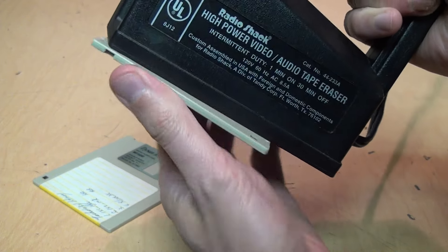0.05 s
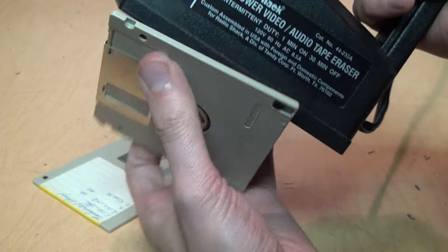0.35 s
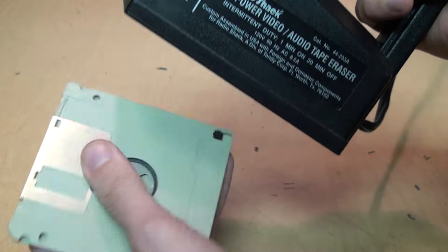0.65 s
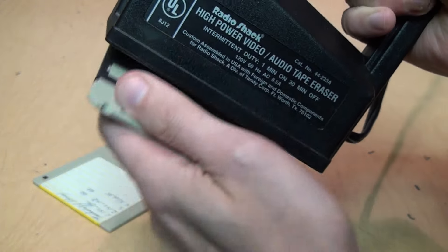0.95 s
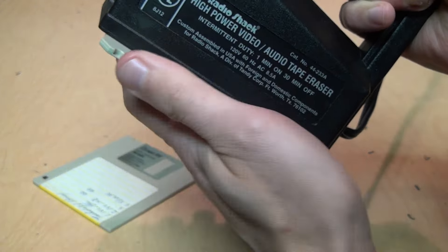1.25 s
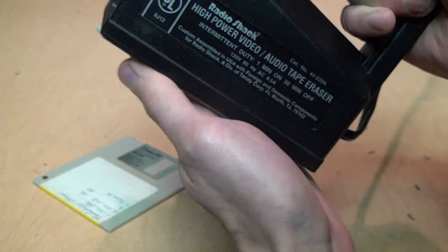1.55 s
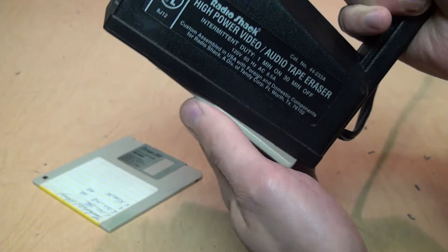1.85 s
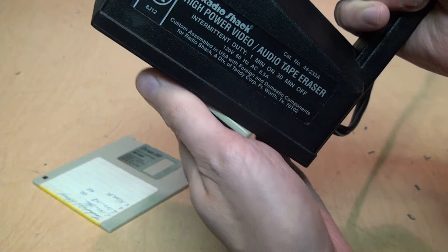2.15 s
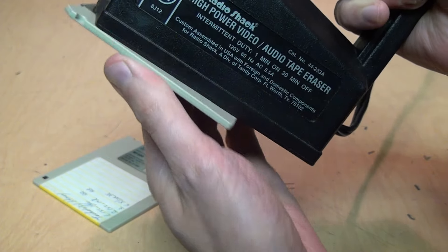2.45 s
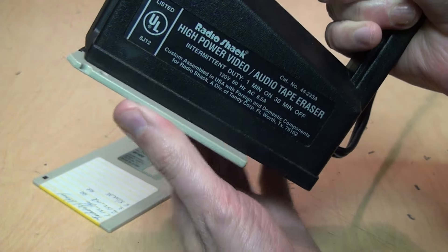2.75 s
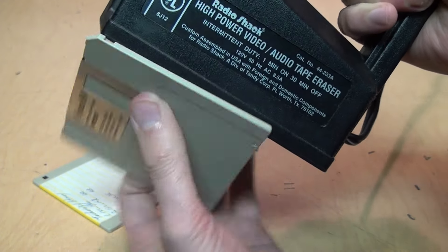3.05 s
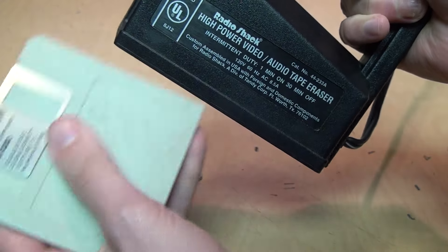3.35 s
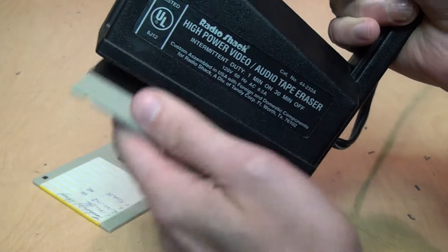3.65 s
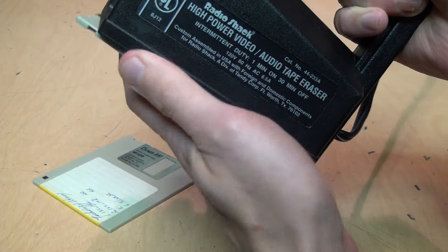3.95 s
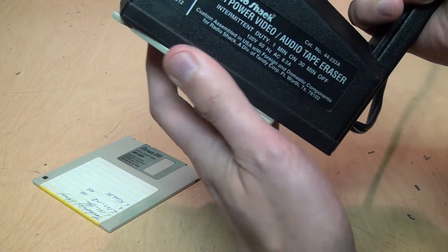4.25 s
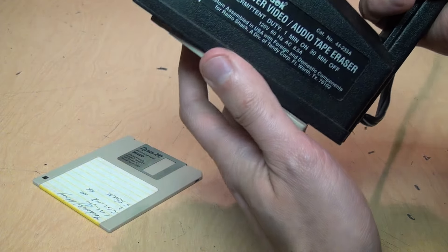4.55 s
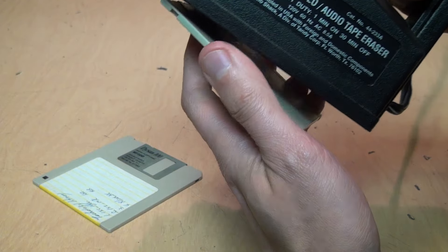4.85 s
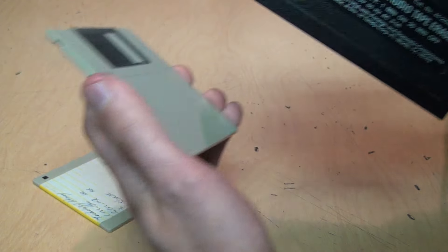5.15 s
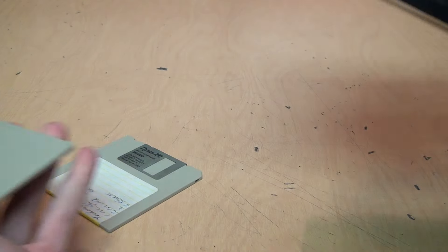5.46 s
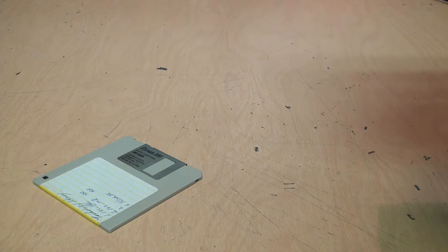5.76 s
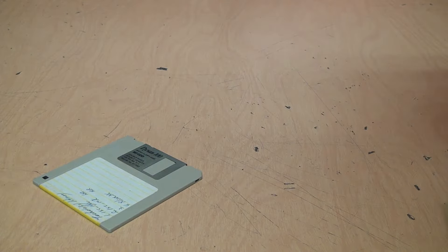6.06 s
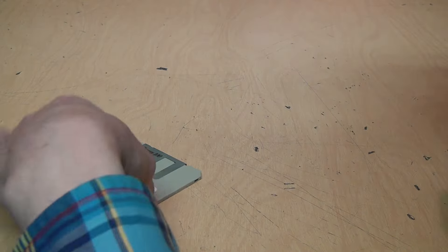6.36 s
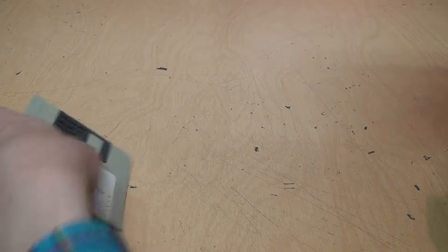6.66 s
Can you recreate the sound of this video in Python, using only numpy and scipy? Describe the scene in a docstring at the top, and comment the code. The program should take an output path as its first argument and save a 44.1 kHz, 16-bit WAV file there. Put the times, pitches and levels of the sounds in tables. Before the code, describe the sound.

An electric tape eraser buzzes and rattles against a plastic floppy disk in three bursts, followed by a few light plastic clacks.

```python
"""In a small quiet room, over a wooden table, floppy disks are held against a mains-powered tape eraser.
In three passes its magnet slaps the disk against the case twice per mains cycle, making a hum and a
hard rattle that snarls where the disk catches and turns ragged as it slides.
The disk scrapes as it is turned over. At the end it is put down with a few clacks
and the next one is picked up."""
import sys
import numpy as np
from scipy import signal
from scipy.fft import rfft, irfft
from scipy.io import wavfile
from scipy.ndimage import uniform_filter1d, map_coordinates

SR = 44100
rng = np.random.default_rng(int(sys.argv[2]) if len(sys.argv) > 2 else 0)


def store_pcm(level_fs):
    """Save levels as 16-bit WAV."""
    pcm = np.round(np.clip(level_fs, -1, 1) * 32767).astype(np.int16)
    wavfile.write(sys.argv[1], SR, np.atleast_2d(pcm).T)


N = 299880
TIME = np.arange(N) / SR
SLAP_HZ = 119.9   # two slaps per mains cycle
ROOM_T60_S = 0.12   # time for an echo to fade by 60 dB

# the disk is brought to the magnet, buzzes and is drawn away: start_s, end_s, level_db, rim_db
ERASING_PASSES = [(-.1, 0.377, -26, -13.5), (0.873, 2.975, -27.5, -10.5), (3.599, 4.849, -26.5, -11.5)]
# the disk catches on the case and snarls: start_s, end_s, level_db, pitch_hz, width_hz, rim_db
DISK_CATCHES = [(.005, 0.068, -20, 2240, 645, -12.5), (0.191, 0.27, -21, 2180, 1280, -8),
                (0.308, 0.42, -27.5, 1840, 447, -11.5), (0.981, 1.03, -21, 2490, 1500, -14),
                (1.104, 1.15, -26.5, 2540, 676, -30), (1.194, 1.285, -23.5, 2330, 2430, -7.5),
                (1.325, 1.395, -26.5, 1880, 990, -2.5), (1.57, 1.68, -27.5, 2060, 500, -10.5),
                (1.725, 2.11, -26.5, 1100, 1290, -5.5), (1.968, 2.154, -26.5, 1840, 900, -9.5),
                (2.145, 2.315, -23.5, 2330, 790, -8.5), (2.434, 2.41, -17, 2020, 1180, 1.5),
                (2.505, 2.74, -24, 2470, 890, -6), (2.828, 2.953, -24, 1840, 444, -5),
                (2.914, 3.005, -25.5, 2240, 2980, 1), (3.695, 3.682, -18.5, 3100, 1580, -4.5),
                (3.72, 3.822, -27, 1180, 1000, -36), (3.96, 4.1, -39.5, 2800, 350, -26),
                (4.25, 4.29, -32, 2800, 1200, -9), (4.382, 4.44, -29.5, 820, 400, -5.5),
                (4.424, 4.47, -19, 2510, 690, -12), (4.546, 4.84, -34.5, 2140, 3100, -0.5),
                (4.733, 4.83, -19.5, 2470, 520, -10), (4.964, 5.065, -30.5, 2230, 900, -21.5)]
# the disk slides and lies loosely: start_s, end_s, added_looseness (0 to 1)
DISK_SLIDES = [(0.191, 0.298, 0.83), (0.852, 1.018, 0.33), (2.913, 3.14, 0.86), (3.602, 3.72, 0.54),
               (4.179, 4.311, 0.35), (4.478, 4.705, 0.36), (4.75, 4.912, 0.19)]
# the disk lifts off the case for a moment: time_s, dip_db, half_length_s
DISK_LIFTS = [(0.332, -12, 0.018), (1.067, -11, 0.019), (1.308, -33, 0.008), (2.385, -6, 0.013),
              (4.047, -7.5, 0.15), (4.508, -7, 0.16)]
# how late in each cycle the disk lands: time_s, lag_ms
LANDING_LAG = [(.45, 4.2), (1.1, 2.85), (2.0, 3.24), (2.6, 2.3), (4.2, 2.28), (4.7, 2.52), (4.88, 3.6),
               (5.0, 2.2)]
# how the plastic shell rings when pressed on the case: pitch_hz, width_hz, level_db
SHELL_RESONANCES = [(849, 177, 4.5), (1404, 270, 3), (2130, 850, 3.5), (2540, 540, 2.5), (4150, 1800, -6.5)]
# the bright ring of the rim and metal shutter: pitch_hz, width_hz, level_db
RIM_RESONANCES = [(6700, 3900, 2.5), (10650, 1600, -1.5)]
# the metal shutter is pinched and rings at one pitch: start_s, end_s, level_db, pitch_hz
SHUTTER_PINCHES = [(0.02, 0.115, -32, 4936), (1.984, 2.093, -34, 11900), (2.182, 2.304, -31, 7200),
                   (2.566, 2.724, -26, 3950), (2.59, 2.79, -30, 7600), (2.608, 2.89, -34, 13100),
                   (4.413, 4.446, -24.5, 4980)]
# the hum of the case, one list per pass: time_s, second_harmonic_db, overtones_db
CASE_HUM = [
    [(0, -22, -31), (.07, -36.5, -22), (.14, -29, -42), (.24, -29.5, -30.5), (.33, -44, -39),
     (.48, -61, -44)],
    [(.9, -43, -39), (1.17, -35.5, -36.5), (1.5, -45.5, -44), (1.82, -35.5, -31), (2.16, -35.5, -31),
     (2.35, -47.5, -46), (3.03, -45, -43.5)],
    [(3.64, -42, -40), (3.76, -31, -34.5), (4.39, -31.5, -31.5), (4.48, -40, -40.5), (4.67, -31.5, -36),
     (4.84, -59, -36.5)],
]
# the balance of the hum's overtones: multiple_of_slap_rate, level_db
HUM_OVERTONES = [(3, -1), (4, -6), (5, -14.5), (6, -8.5)]
# the whole disk swings in the hand at the slap rate: time_s, level_db
DISK_SWING = [(.3, -42), (.6, -59.5), (3.75, -54), (4.5, -49), (4.72, -34), (5.1, -67)]
# the disk clacks as it is handled: time_s, level_db, pitch_hz, chatter_db
DISK_CLACKS = [(0.561, -19.5, 2650, -5), (0.59, -24, 1400, -14), (.675, -26.5, 1830, -37),
               (0.884, -14, 4500, -39), (1.047, -11.5, 7600, -39), (3.091, -30, 3200, 11),
               (3.344, -24, 1450, 10), (3.632, -9.5, 4700, -12), (4.981, -19.5, 3070, 4.5),
               (5.162, -27.5, 3440, -31), (5.417, -25, 2400, -23), (5.685, -26.5, 3500, 0),
               (5.708, -28.5, 1880, -13), (5.887, -18.5, 2180, -4.5), (6.016, -20, 1600, -4),
               (6.019, -9, 2640, -9.5), (6.616, -23, 1830, 0), (6.634, -17, 4600, 1)]
# how a free disk rings: pitch_hz, width_hz, level_db
FREE_DISK_RESONANCES = [(886, 630, 1.5), (1520, 350, 3.5), (1990, 384, 2), (2900, 590, 0.5),
                        (3890, 620, -2.5), (5460, 1270, -4), (7900, 8700, -10)]
# the disk rubs on case, fingers and table: start_s, end_s, level_db, pitch_hz
DISK_RUBS = [(0.542, 0.624, -26, 3500), (0.829, 0.885, -37.5, 1750), (3.09, 3.19, -34.5, 1510),
             (3.23, 3.308, -37.5, 1848), (3.331, 3.403, -27, 2340), (4.18, 4.324, -33, 2520),
             (5.28, 5.427, -50, 1920), (5.532, 5.62, -52, 7350), (6.386, 6.633, -53, 3400),
             (6.58, 6.777, -37, 4900)]
# the hand bumps the heavy case: time_s, level_db
HAND_KNOCKS = [(0.25, -32.5), (2.931, -37), (3.725, -33.5), (4.4, -36.5)]
# the room's background noise from low to high: frequency_hz, relative_level_db
ROOM_SPECTRUM = [(25, -15), (135, -1), (290, -2.5), (450, -9), (1700, -16), (4500, -26.5), (14000, -36)]


def rattle(echo_db=-10.5, lowest_hz=610):
    """The slaps and their echoes make the disk ring, in a tone that changes as it shifts."""
    blows = slaps()
    blows = even_bands(blows + from_db(echo_db) * echoes(blows, dull_hz=5900))
    framing = dict(fs=SR, nperseg=512, noverlap=384)   # short overlapping slices of sound
    f, t, frames = signal.stft(rms_one(blows), **framing)
    response = ringing(pressed_disk(f[:, None] + 1, t))
    _, rung = signal.istft(frames * response, **framing)
    return cut(rung[:N], lowest_hz, "high", order=4)


def slaps(jitter_s=.00005, spread_s=0.0002556, wander_s=0.000198, uneven_db=-6.5, bounce_s=.003):
    """Each magnetic pull lands the disk corner after corner; a loose disk also bounces at random."""
    shifts_per_s, loose_lag_s = 7, 0.000965
    t = np.arange(int(N / SR * SLAP_HZ)) / SLAP_HZ
    loose = looseness(t)
    t = t + curve(LANDING_LAG, t) / 1000 + loose_lag_s * loose
    out = 0
    for corner in range(4):
        seat = np.floor(shifts_per_s * t + rng.random())   # a corner stays put, then jumps to a new spot
        late = corner * spread_s + np.sqrt(corner) * wander_s * drift(1, seat)
        shake = jitter_s * (1 + corner) * loose * rng.standard_normal(len(t))
        size_db = 2.4 * drift(12, t) + uneven_db * loose * rng.standard_normal(len(t))
        out = out + clicks(t + late + shake, (-1) ** (corner // 2) * from_db(size_db))
    bounce_delays = bounce_s * rng.exponential(size=(len(t), 14))
    bounce_sizes = loose[:, None] * rng.standard_normal(bounce_delays.shape)
    return out + clicks(t[:, None] + bounce_delays, bounce_sizes)


def looseness(t, resting=0.13, ease_s=0.0376):
    """How loosely the disk lies, from 0 to 1: it is snug except while it slides."""
    sliding = sum(amount * swell(start, end, ease_s, ease_s, t) for start, end, amount in DISK_SLIDES)
    return np.clip(resting + sliding, 0, 1)


def pressed_disk(f, t, approach_s=0.079, withdraw_s=0.13, grab_s=0.02, let_go_s=0.052):
    """The disk's power by pitch and time: shell and rim ring, and catches and pinches add their own."""
    shell, rim = body_tone(f, SHELL_RESONANCES), body_tone(f, RIM_RESONANCES)
    touch = from_db(sum(dip_db * np.exp(-((t - s) / half_s) ** 2) for s, dip_db, half_s in DISK_LIFTS))
    power = 0
    for start, end, db, rim_db in ERASING_PASSES:
        pull = from_db(db) * touch * swell(start, end, approach_s, withdraw_s, t)
        power = power + pull ** 2 * (shell + from_db(rim_db) ** 2 * rim)
    for start, end, db, hz, width, rim_db in DISK_CATCHES:
        grip = from_db(db) * swell(start, end, grab_s, let_go_s, t)
        snarl = mean_one(peak(f, hz, width) * peak(f, hz, 2 * hz)) + from_db(rim_db) ** 2 * rim
        power = power + grip ** 2 * snarl
    for start, end, db, hz in SHUTTER_PINCHES:
        pinch = from_db(db) * swell(start, end, grab_s, let_go_s, t)
        power = power + pinch ** 2 * mean_one(peak(f, hz, hz / 6) * peak(f, hz, hz / 2))
    return power


def hum(dulling=0.18, waver_db=2.5, fade_s=0.025):
    """The magnet shakes coil, case and disk; the grip shifts the overtones, and a weak hum is duller."""
    gate = sum(swell(rows[0][0], rows[-1][0], fade_s, fade_s) for rows in CASE_HUM)   # off between passes
    times, *levels = np.vstack(CASE_HUM).T
    second_db, overtones_db = (np.interp(TIME, times, db) for db in levels)
    phase = 2 * np.pi * SLAP_HZ * (TIME - curve(LANDING_LAG) / 1000)
    dull_db = dulling * np.minimum(overtones_db - np.median(overtones_db), 0)
    overtones = 0
    for multiple, db in HUM_OVERTONES:
        size = from_db(db + (multiple - 3) * dull_db + waver_db * drift(5))
        overtones = overtones + size * np.cos(multiple * (phase - 1) + .5 * drift(5))
    case = from_db(second_db) * np.cos(2 * phase - 2) + from_db(overtones_db) * overtones
    swing = from_db(curve(DISK_SWING)) * np.cos(phase - 1)
    return gate * case + swing


def clacks(contact_s=0.0014, chatter_t60_s=0.1, ring_db=-1.5, ring_width_hz=200):
    """A short hard hit rings at its own pitch, then the loose shutter and hub chatter in the shell."""
    out, t = np.zeros(N + SR), TIME[:SR // 5]
    for s, db, hz, chatter_db in DISK_CLACKS:
        force = np.exp(-t / contact_s) + from_db(chatter_db - 60 * t / chatter_t60_s) / 2
        hit = contact(resonate(rng.standard_normal(len(t)) * force, FREE_DISK_RESONANCES), hz)
        hit = hit + resonate(hit, [(hz, ring_width_hz, ring_db)])
        loudest = np.sqrt(uniform_filter1d(hit * hit, size=88).max())   # the strongest 2 ms
        out[round(s * SR):][:len(t)] += from_db(db) * hit / loudest
    return out[:N]


def rubs(grains_per_s=3000, grain_db=1.5, clump_db=5.5, rise=0.23, fall=0.32):
    """Plastic sticks and slips in clumps of tiny ticks that make the disk ring."""
    size_db = grain_db * np.minimum(rng.exponential(size=N), 4) + clump_db * drift(50)
    sizes = from_db(size_db) * rng.standard_normal(N)
    grains = resonate(sizes * (rng.random(N) < grains_per_s / SR), FREE_DISK_RESONANCES)
    out = np.zeros(N)
    for start, end, db, hz in DISK_RUBS:
        part = slice(int(start * SR), int(end * SR))
        progress = np.linspace(0, 1, len(out[part]))
        stroke = np.clip(np.minimum(progress / rise, (1 - progress) / fall), 0, 1)
        out[part] += from_db(db) * stroke * rms_one(contact(grains[part], hz))
    return out


def knocks(band_hz=(120, 560), fade_s=0.05):
    """Soft bumps of the hand shake the case with a short low rumble."""
    rumble = rms_one(cut(rng.standard_normal(N), band_hz, "band"))
    return rumble * sum(from_db(db) * np.exp(-np.abs(TIME - s) / fade_s) for s, db in HAND_KNOCKS)


def echoes(x, dull_hz, first_s=0.00118):
    """Sound bounces off table and walls as a dense tail that dies quickly."""
    t = TIME[:SR // 3]
    noise = cut(rng.standard_normal(len(t)), dull_hz, "low", order=1)
    tail = noise * from_db(-60 * t / ROOM_T60_S) * (t > first_s)
    return signal.fftconvolve(x, tail / np.linalg.norm(tail))[:N]


def room_tone(level_db=-47, side_db=-45.0):
    """Steady dull air noise, nearly the same in both ears."""
    hz, db = np.transpose(ROOM_SPECTRUM)
    f = np.arange(N // 2 + 1) * SR / N
    colour = from_db(np.interp(np.log(f + 1), np.log(hz), db))
    mid, side = (rms_one(irfft(rfft(white) * colour, N)) for white in rng.standard_normal((2, N)))
    return from_db(level_db) * (mid + from_db(side_db) * side * [[1], [-1]])


def contact(x, hz):
    """A touch favours sound near its own pitch: low when flat and soft, high on an edge."""
    return cut(x, [hz / 2, min(hz * 2, .45 * SR)], "band", order=1)


def resonate(x, resonances):
    """Makes a sound ring at several pitches at once."""
    out = 0
    for k, (hz, width, db) in enumerate(resonances):
        r = np.exp(-np.pi * width / SR)
        poles = [1, -2 * r * np.cos(2 * np.pi * hz / SR), r * r]
        ring = (1 - r * r) / 2 * signal.lfilter([1, 0, -1], poles, x + 1e-18)
        out = out + (-1) ** k * from_db(db) * ring   # flipped neighbours keep the dips between shallow
    return out


def peak(f, hz, width):
    """How much power one resonance passes at each frequency f."""
    return 1 / (1 + ((f * f - hz * hz) / (f * width)) ** 2)


def body_tone(f, resonances):
    """The power of a part's resonances added together, averaging 1."""
    powers = (from_db(db) ** 2 * peak(f, hz, width) * peak(f, hz, hz) for hz, width, db in resonances)
    return mean_one(sum(powers))


def ringing(power):
    """Turns power at each pitch into a filter that rings after a blow, never before it."""
    cepstrum = irfft(np.log(power + 1e-9), axis=0)
    cepstrum[0] /= 2
    cepstrum[len(cepstrum) // 2:] = 0
    return np.exp(rfft(cepstrum, axis=0))


def even_bands(x):
    """Evens out the slaps from bass to treble but keeps their fine, shifting ripple."""
    edges_hz = np.geomspace(750, 13000, 14)
    lows = [signal.sosfiltfilt(signal.butter(4, hz, fs=SR, output="sos"), x) for hz in edges_hz]
    bands = np.diff([0 * x] + lows + [x], axis=0)
    widths_hz = np.diff([0, *edges_hz, SR / 2])
    return sum(np.sqrt(width) * even(band) for band, width in zip(bands, widths_hz))


def even(x):
    """Holds the power at 1 over a few slaps."""
    size = round(3 * SR / SLAP_HZ)
    power = uniform_filter1d(uniform_filter1d(x * x, size), size)
    return x / np.sqrt(np.abs(power) + 1e-12)


def clicks(times, sizes):
    """Clean clicks at exact times, even between samples."""
    at = np.ravel(times)[:, None] * SR
    taps = np.floor(at).astype(int) + np.arange(-3, 5)
    shape = np.sinc(taps - at) * np.sinc((taps - at) / 4) * (taps >= 0) * (taps < N)
    pulses = shape * np.ravel(sizes)[:, None]
    return np.bincount(np.clip(taps, 0, N - 1).ravel(), pulses.ravel(), N)


def swell(start, end, attack_s, release_s, t=TIME):
    """Rises from the start, holds until the end, then falls away."""
    return np.clip(np.minimum((t - start) / attack_s, 1 - (t - end) / release_s), 0, 1)


def drift(rate, t=TIME):
    """A smooth random wobble of size about 1, changing `rate` times a second."""
    return map_coordinates(rng.standard_normal(1024), [t * rate], mode="wrap")


def curve(rows, t=TIME):
    """Reads a two-column table at the times t."""
    return np.interp(t, *np.transpose(rows))


def cut(x, hz, kind, order=3):
    """Keeps the lows, the highs or one band of a sound."""
    return signal.sosfilt(signal.butter(order, hz, kind, fs=SR, output="sos"), x + 1e-18)


def from_db(db):
    return 10 ** (np.asarray(db) / 20)


def rms_one(x):
    return x / np.sqrt(np.mean(x ** 2) + 1e-20)


def mean_one(power):
    return power / power.mean()


def scene(echo_db=-13.0, side_db=-20.5, left_db=0.4):
    """The eraser is straight ahead; the disks are handled a little to the left."""
    left_right = np.array([[1], [-1]])
    handling = clacks() + rubs()
    handling = handling + from_db(echo_db) * echoes(handling, dull_hz=8150)
    near = rattle() + hum() + knocks() + room_tone() + handling * from_db(left_db * left_right)
    # the walls answer the two sides differently, except in the bass
    above_bass = cut(near.mean(0), 530, "high", order=4)
    return near + from_db(side_db) * echoes(above_bass, dull_hz=13700) * left_right


def record(dry, cutoff_hz=16200):
    """Rounds off the loudest peaks and cuts the highest treble."""
    rounded = dry / (1 + dry ** 6) ** (1 / 6)
    return signal.sosfilt(signal.ellip(10, .2, 80, cutoff_hz, fs=SR, output="sos"), rounded)


dry = scene()
out = record(dry)
store_pcm(out)
```